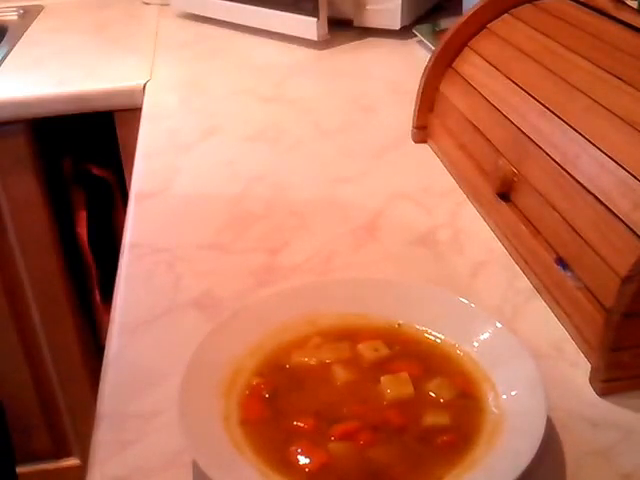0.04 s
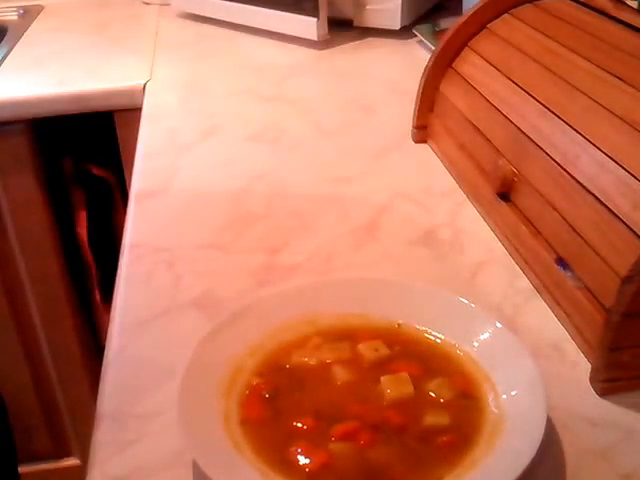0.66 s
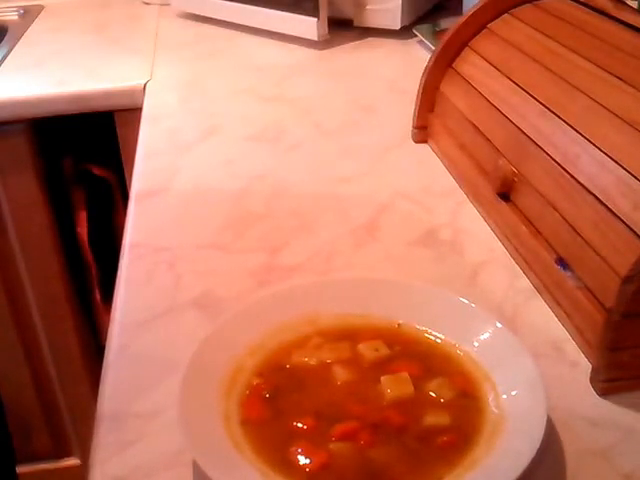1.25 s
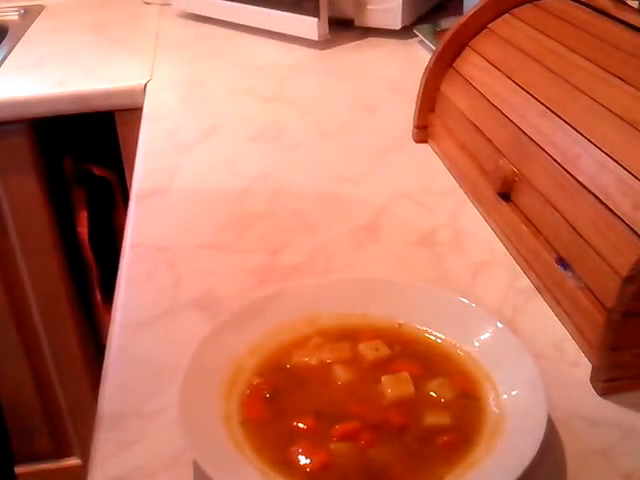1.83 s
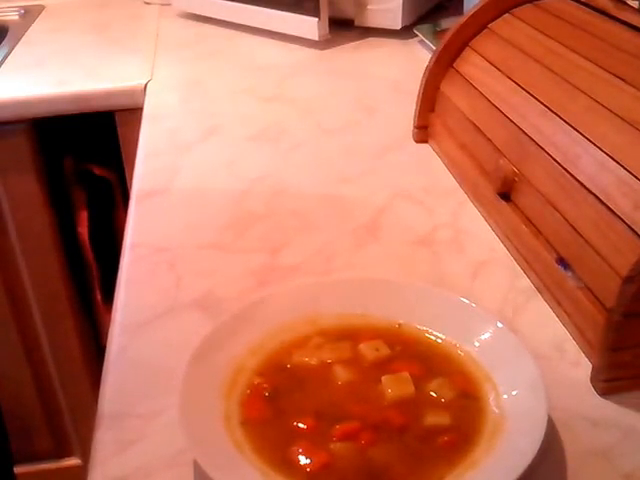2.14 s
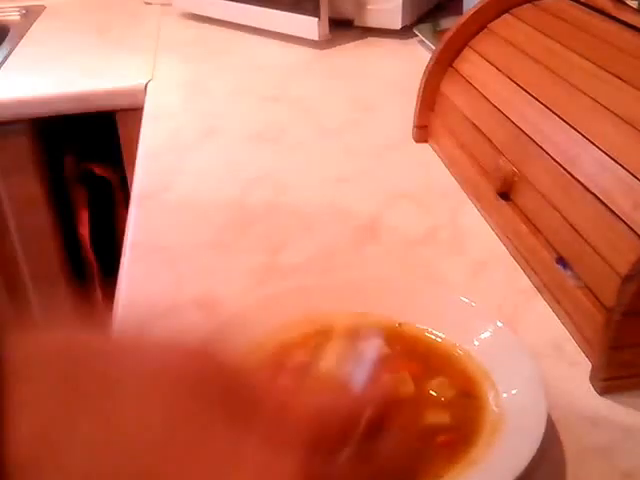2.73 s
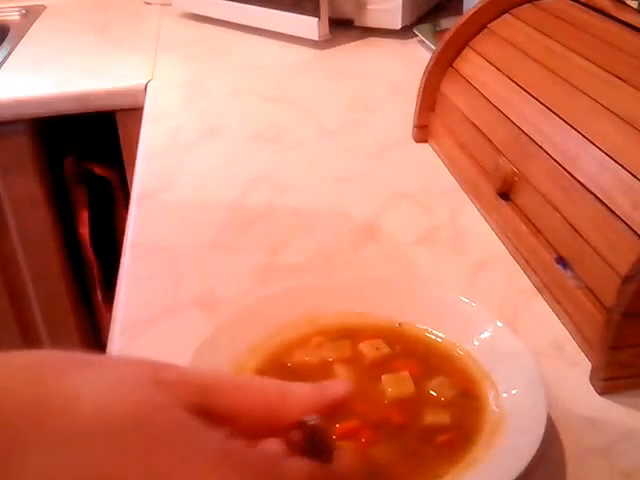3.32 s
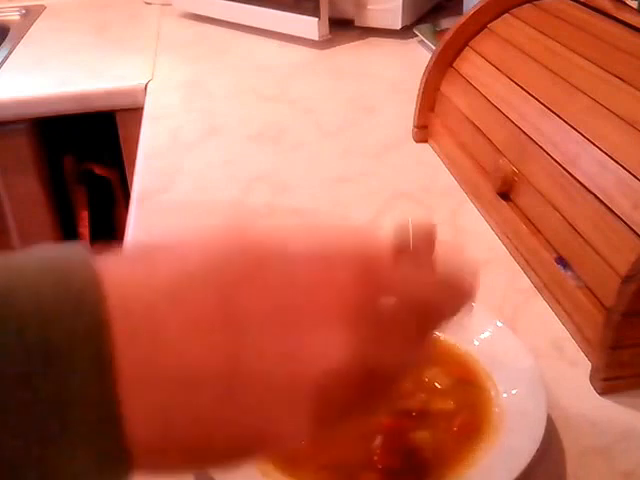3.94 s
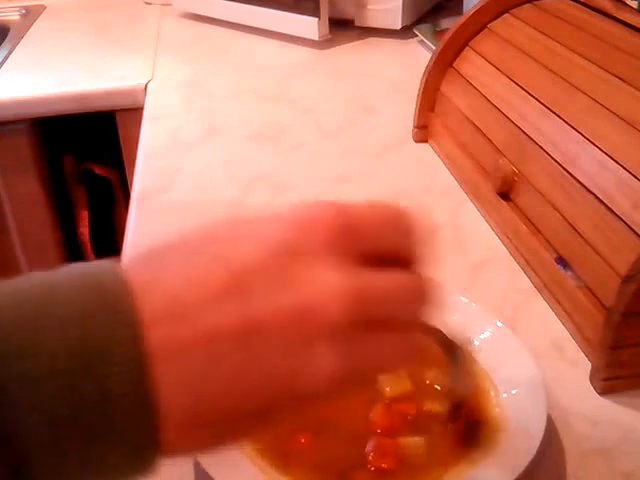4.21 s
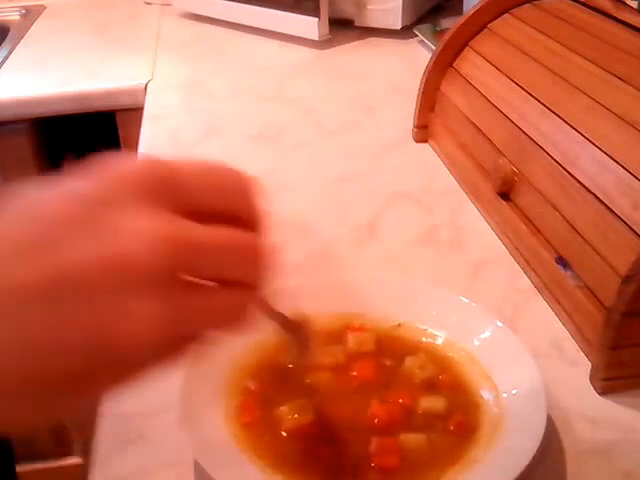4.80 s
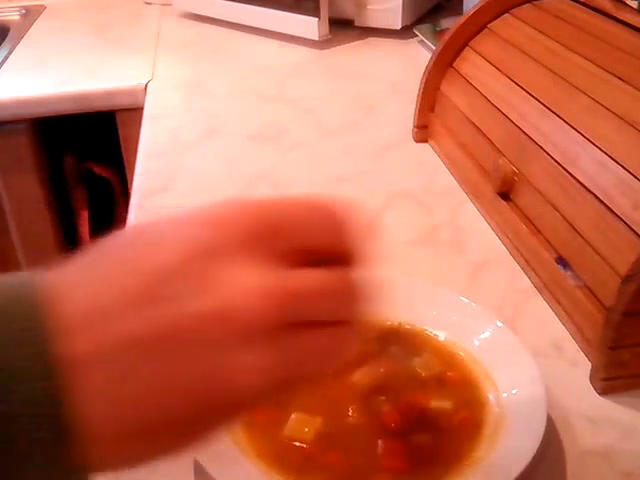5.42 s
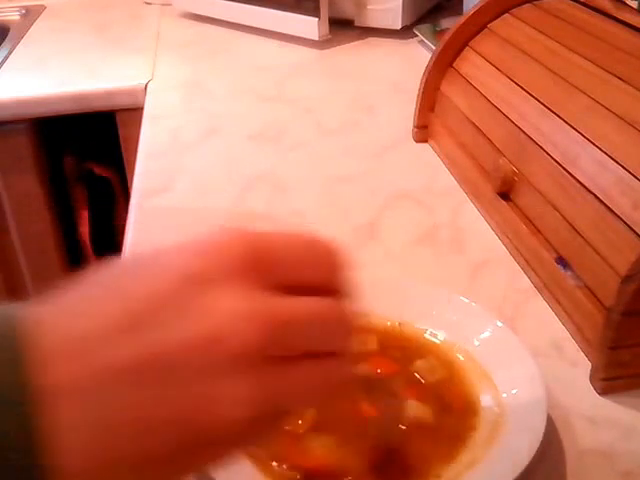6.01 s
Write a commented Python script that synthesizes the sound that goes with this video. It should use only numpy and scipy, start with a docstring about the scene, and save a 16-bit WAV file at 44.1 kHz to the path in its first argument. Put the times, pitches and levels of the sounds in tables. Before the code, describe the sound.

A steel spoon is picked up, plops into soup and clinks against a china bowl while stirring, over a kitchen appliance hum.

```python
"""A small kitchen, one mono camera microphone close to the worktop; an appliance hum, hiss and a thin
whine run throughout. At 1.2 s, a little way off, a steel spoon ticks and slides as it is picked up.
At 2.8 s it plops into chunky soup in a china bowl. From 3.4 s it stirs, clinking hard five times with
lighter touches between; each blow rings the china and knocks the worktop under it. The hardest comes
last, near 6 s, and the camera's gain control ducks after it."""
import sys
import numpy as np
from scipy import signal
from scipy.fft import rfft, irfft, next_fast_len
from scipy.io import wavfile
from scipy.ndimage import map_coordinates

SR = 44100
rng = np.random.default_rng(int(sys.argv[2]) if len(sys.argv) > 2 else 0)


def waveform_to_disk(signal):
    """Save audio, clipped to [-1, 1], as 16-bit WAV at the path in sys.argv[1]."""
    frames = np.transpose(np.atleast_2d(signal))
    scaled = np.clip(frames, -1, 1) * 32767
    samples = np.round(scaled).astype(np.int16)
    wavfile.write(sys.argv[1], SR, samples)


N = 271479
TIME = np.arange(N) / SR
RING_TIME = np.arange(int(.42 * SR)) / SR

# Edges in Hz of the registers in which the bowl speaks.
BOWL_EDGES = [150, 620, 1100, 1950, 2550, 3350, 3920, 5250, 6650, 7350]
# The filled bowl on the worktop, spoon against it. Each row: frequency in Hz, level in dB, t60 in seconds.
BOWL_MODES = [(195, -3, .08), (265, -4, .08), (404, -4, .15), (487, -5, .14), (549, -5, .19), (785, 3, .1),
              (920, -7, .1), (1012, -9, .09), (1230, -7, .07), (1520, 0, .05), (2150, -4, .05),
              (2680, -4, .05), (2900, -3, .02), (5420, -12, .12), (5702, -9, .15), (5950, -5, .06),
              (6200, -4, .04), (6640, -15, .12), (7200, -11, .1), (1345, -7, .25), (2275, 9, .04),
              (2386, -7, .08), (3200, -14, .45), (3612, -11, .15), (3640, 10, .028), (3678, -10, .19),
              (3757, -9, .16), (4360, -3, .21)]
# The colour of a loosely held blow. Each row: frequency in Hz, gain in dB.
LOOSE_EQ = [(300, -1.5), (830, 0), (1470, 0), (2230, 1), (2900, -6), (3700, -15.5), (4600, -8.5),
            (5900, -0.5), (7000, -5)]
# A firm grip adds a clack near 3.7 kHz and damps the top. Each row: frequency in Hz, gain in dB.
GRIP_EQ = [(2900, 1), (3700, 26), (4600, -1.5), (5900, 2), (7000, -36.5)]
# Spoon on china. Each row: start in seconds, level in dB, grip from 0 loose to 1 firm, brightness in dB
# per octave, accent in Hz, accent in dB, modes against crack in dB, rim pitch in Hz, rim level in dB.
BOWL_BLOWS = [(3.3716, -32.5, 0.02, 0, 4500, 9, 8.5, 2170, -37),
              (3.5279, -29.5, 0.26, 0.2, 2300, 3.5, 3.5, 2192, -27),
              (3.7123, -50.5, 0.69, 0.5, 2550, 12, -2, 2310, -43),
              (3.7457, -59.5, 0.82, -1, 2400, 11, 5, 2270, -59),
              (4.5104, -29.5, 0.83, 0.6, 2390, 14, 1, 2260, -28),
              (4.525, -36, 0.9, -2, 2080, 5, -9, 2307, -29),
              (5.3024, -34.5, 0.69, 1, 2280, 6.5, 7, 2228, -24.5),
              (5.9077, -57, .35, -0.5, 4470, 20, -10, 2090, -60),
              (5.9633, -17.5, 1, -0.5, 2200, 2.5, 4, 2270, -17.5)]


def clinks(accent_octaves=0.23, grip_loss_db_per_s=152, rim_t60=0.6, rim_damping=0.6):
    """Close to the microphone, steel meets china: bowl and worktop clack and the rim rings on."""
    track, hz = np.zeros(N), centres(BOWL_EDGES)
    for start, db, grip, brightness, accent_hz, accent_db, modes_db, rim_hz, rim_db in BOWL_BLOWS:
        # the point of contact favours one range
        accent = accent_db * np.exp(-.5 * (np.log2(hz / accent_hz) / accent_octaves) ** 2)
        colour = along(LOOSE_EQ, hz) + grip * along(GRIP_EQ, hz)
        levels = db + colour + tilt(hz, brightness) + accent
        damped = [(f, level, 60 / (60 / t60 + grip * grip_loss_db_per_s)) for f, level, t60 in BOWL_MODES]
        room = kitchen(near_db=-1, walls_db=-5.5, near_t60=0.042)
        add(track, start, blow(damped, BOWL_EDGES, levels, room, crack_db=8 - modes_db, crack_t60=0.017))
        add(track, start, rim(rim_hz, rim_db, rim_t60 * (1 - rim_damping * grip)))
    return track


def rim(hz, db, t60, split_hz=30, twin_db=-11):
    """The china rim sings in two close modes that beat."""
    return (mode(hz, db, t60) + mode(hz + split_hz, db + twin_db, t60)) * (1 - fade(0.0022))


def blow(modes, edges, levels, room, crack_db, crack_t60):
    """One contact: a crack and ringing modes, each register levelled over its first 20 ms."""
    n, attack = len(RING_TIME), int(.02 * SR)
    out = np.zeros(n)
    noise, hz = rfft(rng.standard_normal(n)), np.fft.rfftfreq(n, 1 / SR)
    for lo, hi, db in zip(edges, edges[1:], levels):
        # high registers speak at once, low ones take a few cycles to build
        onset = 1 - np.exp(-(RING_TIME * hi / 2) ** 2)
        band_noise = unit(irfft(noise * (hz >= lo) * (hz < hi), n))
        crack = amp(crack_db) * band_noise * fade(crack_t60) * onset
        tones = sum(mode(f, level + rng.normal(), t60) for f, level, t60 in modes if lo <= f < hi) * onset
        # the crack scatters all round; the ring reaches the microphone mostly direct
        heard = crack + tones + echoes(crack + .5 * tones, room)
        out += amp(db) * heard / np.std(heard[:attack])
    return out


# Edges in Hz of the loose spoon's registers.
SPOON_EDGES = [1000, 2200, 3700, 5200, 7300]
# The spoon in the fingers. Each row: frequency in Hz, level in dB, t60 in seconds.
SPOON_MODES = [(1260, -26, 0.039), (1880, -35, 0.025), (2390, -2.5, 0.11), (2754, 4.5, 0.065),
               (3270, -27, .03), (4610, 7.5, 0.05), (5356, 8.5, 0.073), (5840, 9, .05), (6150, 15, 0.031)]
# The colour of the spoon lying on the worktop. Each row: frequency in Hz, gain in dB.
LYING_EQ = [(1500, -6.5), (2850, -2), (4400, -15), (6200, 1)]
# Lifted, it loses the worktop's body and the handle rings freely. Each row: frequency in Hz, gain in dB.
LIFT_EQ = [(1500, -7.5), (2850, -8.5), (4400, 17), (6200, -4)]
# Each row: start in seconds, relative level in dB, lift from 0 lying to 1 clear,
# brightness in dB per octave.
SPOON_TICKS = [(1.1583, -42, .1, 4.5), (1.3324, -14.5, 0.26, 1), (1.34, -20.5, .2, 1),
               (1.408, -18, .02, -1.5), (1.524, -20.5, 0.72, 0.5), (1.533, -42, 0.45, 7),
               (1.6241, -28, 0.75, 3), (1.645, -23.5, 0.66, 2.4), (1.865, -50, .1, 8),
               (2.0086, -37, .95, -1), (2.0206, -37, 1, 0.5)]


def pickup(trim_db=-18):
    """A little further from the microphone, thin steel ticks as the spoon is taken up."""
    track, hz = np.zeros(N), centres(SPOON_EDGES)
    for start, db, lift, brightness in SPOON_TICKS:
        levels = db + along(LYING_EQ, hz) + lift * along(LIFT_EQ, hz) + tilt(hz, brightness)
        room = kitchen(near_db=-5.5, walls_db=-5, near_t60=0.077)
        add(track, start, blow(SPOON_MODES, SPOON_EDGES, levels, room, crack_db=9, crack_t60=.025))
    return amp(trim_db) * track


# Plops in the soup. Each row: start in seconds, level in dB, pitch in Hz, t60 in seconds.
PLOPS = [(2.7899, -27.5, 510, 0.048), (2.802, -23, 160, 0.045), (2.812, -24.5, 270, 0.044)]


def plunge(splash_s=2.815, splash_db=-47, splash_width_s=0.022):
    """Dull, low plops and a short wet hiss as the spoon goes into the soup."""
    track = np.zeros(N)
    for start, db, hz, t60 in PLOPS:
        plop = mode(hz, db, t60) * (1 - fade(0.017))
        room = kitchen(near_db=-6.5, walls_db=-7, near_t60=0.075)
        add(track, start, plop + echoes(plop, room))
    wet_band = signal.butter(1, [550, 3600], "bandpass", fs=SR, output="sos")
    wet = unit(signal.sosfilt(wet_band, rng.standard_normal(N)))
    return track + amp(splash_db) * wet * np.exp(-((TIME - splash_s) / splash_width_s) ** 2)


# The spoon's edge sliding as it lifts. Each row: time in seconds, pitch in Hz, relative level in dB.
SLIDE_PATH = [(1.36, 2570, -62), (1.42, 2570, -49), (1.5, 2430, -50.5), (1.53, 2675, -57),
              (1.57, 3110, -50), (1.61, 3250, -45.5), (1.66, 3360, -52), (1.75, 3510, -62)]


def slide(trim_db=-3):
    """The edge catches and lets go: a faint, rough band that rises as the spoon tilts."""
    pitch, db = curves(SLIDE_PATH)
    grain = (wobble(520) + 1j * wobble(520)) * amp(2.5 * wobble(110))
    scrape = unit(np.real(grain * np.exp(2j * np.pi * np.cumsum(pitch) / SR)))
    sliding = (TIME > SLIDE_PATH[0][0]) & (TIME < SLIDE_PATH[-1][0])
    return amp(db + trim_db) * scrape * sliding


# The decay of the kitchen walls. Each row: frequency in Hz, t60 in seconds.
WALL_DECAY = [(150, 0.24), (600, 0.48), (2500, 0.33), (7000, 0.29)]


def kitchen(near_db, walls_db, near_t60):
    """The room's answer at the microphone: worktop and bread bin close by, then the walls."""
    n = len(RING_TIME)
    near = rng.standard_normal(n) * fade(near_t60) * (RING_TIME > .003)
    hz, t, spectrum = signal.stft(rng.standard_normal(n), SR, nperseg=256)
    decay = np.exp(-np.log(1000) * t / along(WALL_DECAY, hz)[:, None])
    walls = signal.istft(spectrum * decay, SR, nperseg=256)[1][:n] * (1 - fade(0.082))
    return amp(near_db) * near / np.linalg.norm(near) + amp(walls_db) * walls / np.linalg.norm(walls)


def echoes(x, room):
    """What the room sends back of one ring."""
    return signal.fftconvolve(x, room)[:len(x)]


# Room air and microphone hiss. Each row: frequency in Hz, relative density in dB.
AIR_SPECTRUM = [(15, -81), (25, -27.5), (70, -9), (81, -13), (102, -1.5), (140, -4), (158, -9.5), (191, -7),
                (330, -10.5), (533, -11.5), (745, -15.5), (4810, -24.5), (5680, -24.5), (6100, -23.5),
                (7570, -28.5), (9840, -57.5), (16700, -120)]
# Their slow drift. Each row: time in seconds, level in dB.
AIR_LEVEL = [(0, -48), (1.1, -47.5), (1.8, -46.5), (4.4, -47), (6.15, -50)]
# Appliance hum and, last, the camera's whine. Each row: frequency in Hz, rms level in dB.
HUM_TONES = [(100.2, -52.5), (129.4, -59), (537, -63.5), (550, -66.5), (5958.5, -56)]


def room_tone(waver_db=1.64):
    """Behind everything, air and hiss with a slightly unsteady hum and a thin whine."""
    air = unit(filtered(rng.standard_normal(N), lambda hz: amp(along(AIR_SPECTRUM, hz))))
    hum = np.zeros(N)
    for hz, db in HUM_TONES:
        peak = np.sqrt(2) * amp(db + waver_db * wobble(4.8))
        hum += peak * np.sin(2 * np.pi * (hz * TIME + rng.random()) + 0.2 * wobble(12))
    return amp(curves(AIR_LEVEL)[0]) * air + hum


def amp(db):
    """Decibels to gain."""
    return 10 ** (np.asarray(db) / 20)


def unit(x):
    """Scale to rms 1."""
    return x / np.sqrt(np.mean(x ** 2) + 1e-20)


def fade(t60):
    """A decay of 60 dB every t60 seconds."""
    return np.exp(-np.log(1000) * RING_TIME / t60)


def mode(hz, db, t60):
    """One decaying partial at a random phase."""
    return amp(db) * fade(t60) * np.sin(2 * np.pi * (hz * RING_TIME + rng.random()))


def centres(edges):
    """The middle of each register in Hz."""
    return np.sqrt(np.multiply(edges[:-1], edges[1:]))


def tilt(hz, db_per_octave, pivot_hz=1500):
    """Gain in dB: a sharper contact favours the high registers."""
    return db_per_octave * np.log2(hz / pivot_hz)


def along(points, hz):
    """Read (Hz, value) points on a log axis."""
    f, values = np.transpose(points)
    return np.interp(np.log(hz + 1), np.log(f + 1), values)


def curves(rows):
    """One value per sample for each column after the time."""
    times, *columns = np.transpose(rows)
    return [np.interp(TIME, times, column) for column in columns]


def wobble(rate):
    """A smooth random curve, rate knots a second."""
    return map_coordinates(rng.standard_normal(int(N * rate / SR) + 4), [TIME * rate])


def filtered(x, response):
    """Shape x by a gain that depends on frequency."""
    size = next_fast_len(N + SR // 2)
    return irfft(rfft(x, size) * response(np.fft.rfftfreq(size, 1 / SR)), size)[..., :N]


def add(track, start_s, x):
    """Mix x into the track from start_s."""
    start = round(start_s * SR)
    track[start:start + len(x)] += x[:N - start]


def scene():
    """Everything reaches one microphone by the worktop."""
    mono = clinks() + pickup() + slide() + plunge() + room_tone()
    return np.array([mono, mono])


def gain_control(x, threshold_db=-14, release_db_per_s=4.0, slope=0.66):
    """Loud blows pull the camera's gain down within milliseconds; it creeps back slowly."""
    window = int(.004 * SR)
    power = signal.lfilter(np.ones(window) / window, 1, x[0] ** 2)
    cut_db = slope * np.maximum(10 * np.log10(np.abs(power) + 1e-12) - threshold_db, 0)
    recovery_db = release_db_per_s * TIME
    return x * amp(recovery_db - np.maximum.accumulate(cut_db + recovery_db))


def record(dry, ceiling=0.63, low_cut_hz=60, top_hz=7500, camera_rate_hz=16000, mirror_db=-56):
    """The camera drops the deep bass, rides its gain, rounds off peaks and limits the band."""
    low_cut = signal.butter(2, low_cut_hz, "highpass", fs=SR, output="sos")
    ducked = gain_control(signal.sosfilt(low_cut, dry))
    rounded = ducked / (1 + (ducked / ceiling) ** 6) ** (1 / 6)
    narrow = filtered(rounded, lambda hz: 1 / np.sqrt(1 + (hz / top_hz) ** 100))
    # its low sample rate leaves a faint mirror image above the band
    mirror = amp(mirror_db) * 2 * narrow * np.cos(2 * np.pi * camera_rate_hz * TIME)
    return filtered(narrow + mirror, lambda hz: hz < 15700)


dry = scene()
out = record(dry)
waveform_to_disk(out)
```